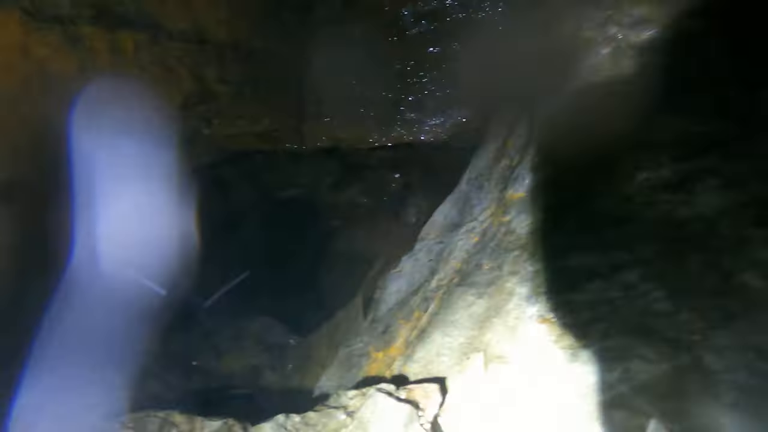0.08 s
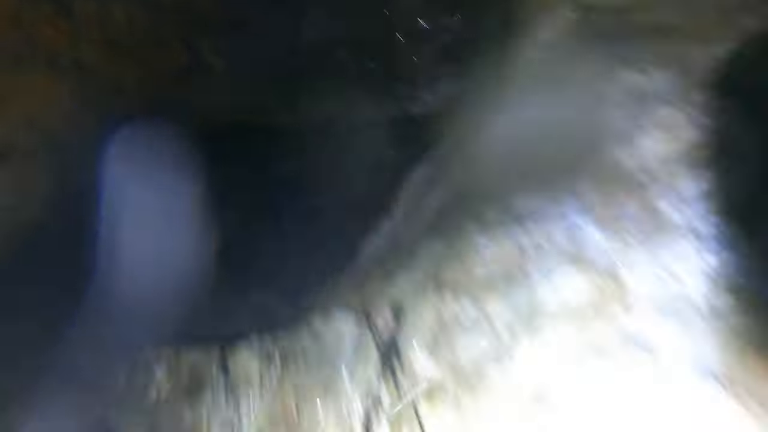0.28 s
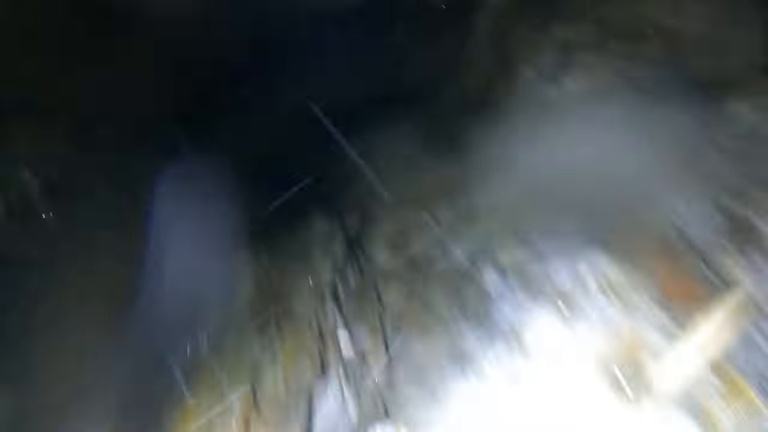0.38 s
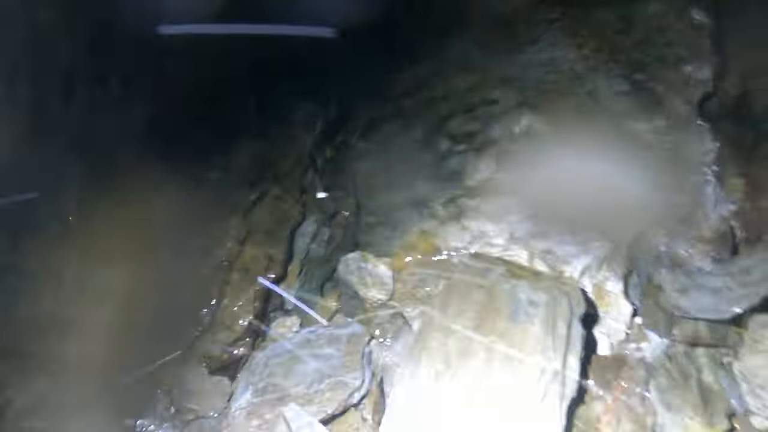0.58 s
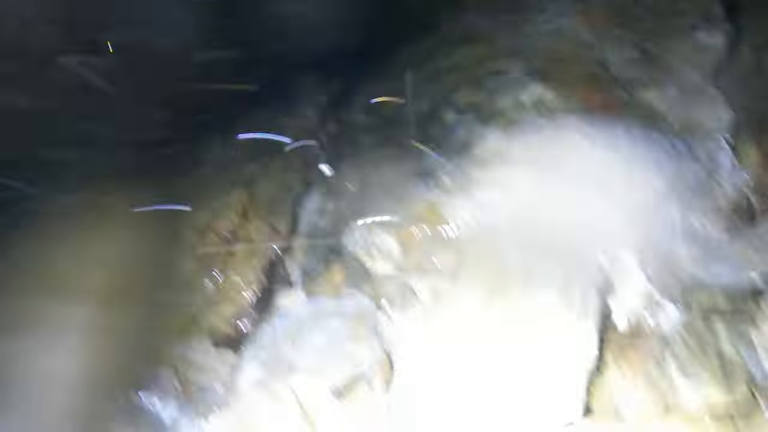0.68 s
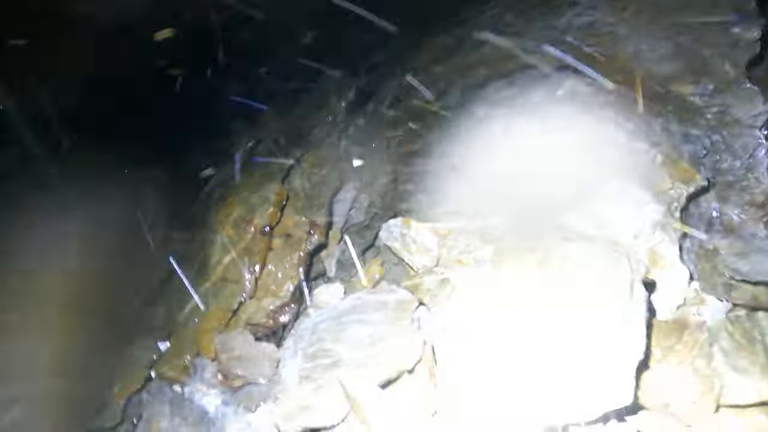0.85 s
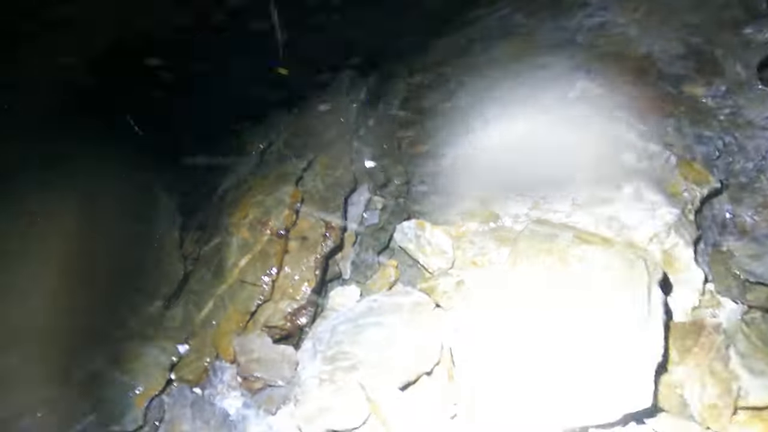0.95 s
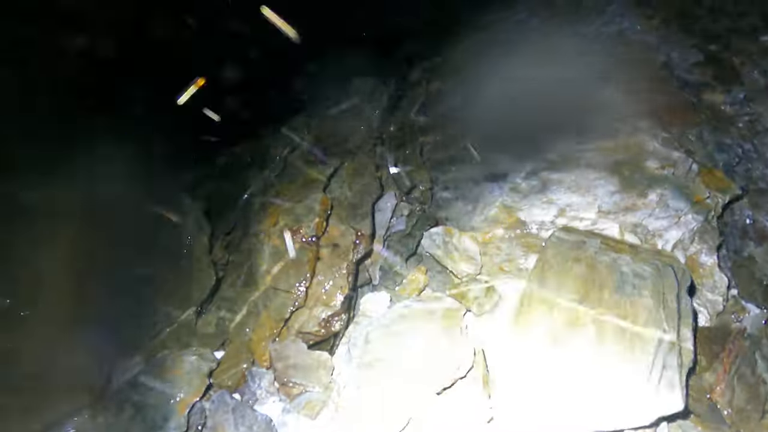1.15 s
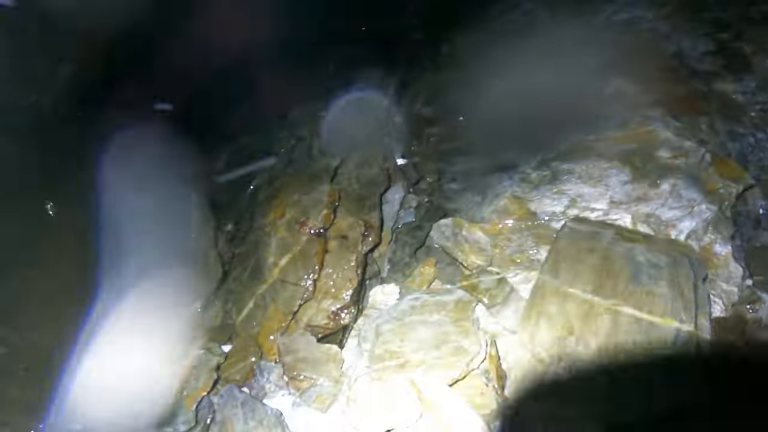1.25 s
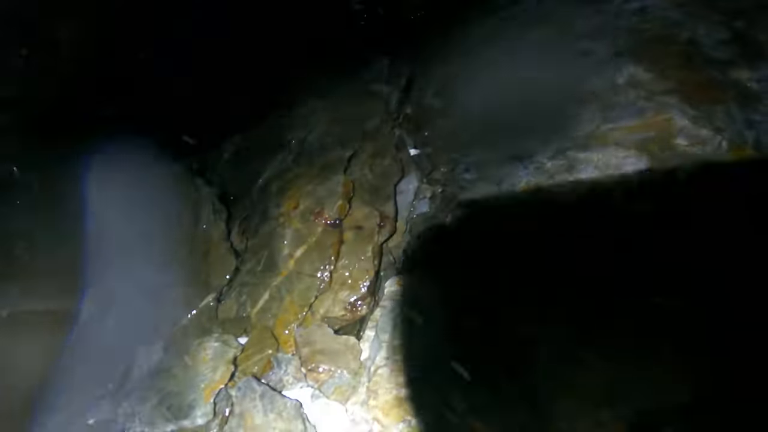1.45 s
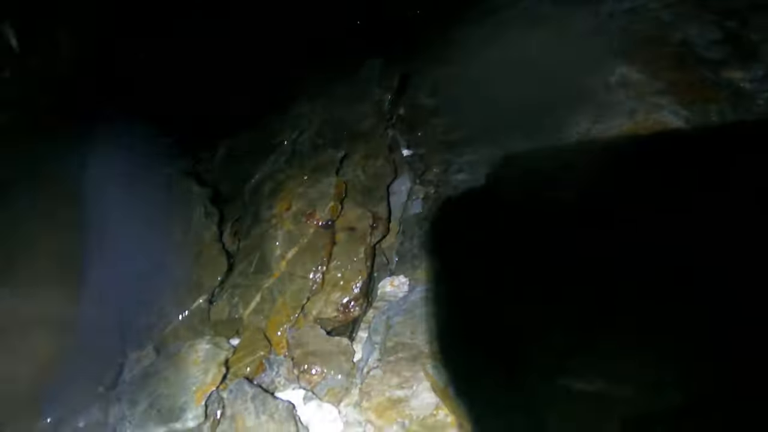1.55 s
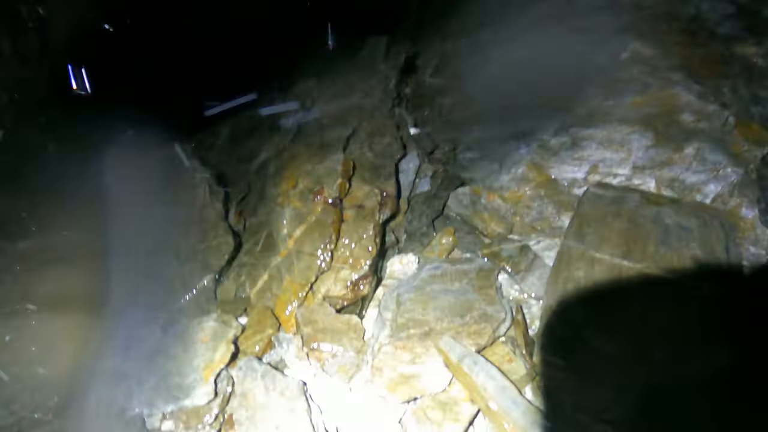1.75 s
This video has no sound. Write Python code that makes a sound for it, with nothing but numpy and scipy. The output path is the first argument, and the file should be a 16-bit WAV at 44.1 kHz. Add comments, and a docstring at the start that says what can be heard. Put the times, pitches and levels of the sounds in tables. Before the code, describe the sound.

Dripping water spatters close by, then the camera case knocks and scrapes on stone, and sparse drops follow

```python
"""Close drops splash on a sealed hand-held camera over a soft low rumble and the patter of falling water.
Drops and patter are filtered noise, with a decaying sine in each close drop; the case colours both.
Knocks and scrapes on cave rock excite damped modes of the case; the glove rubs and creaks along it.
The hand adds shaped low noise, a sagging thump and soft taps."""
import sys
import numpy as np
from scipy import signal
from scipy.fft import rfft, irfft
from scipy.io import wavfile
from scipy.ndimage import uniform_filter1d

SR = 44100
rng = np.random.default_rng(int(sys.argv[2]) if len(sys.argv) > 2 else 0)


def log_audio(samples):
    """Write samples as a 16-bit WAV file to the path given in sys.argv[1]."""
    # one column per channel
    frames = np.atleast_2d(samples).T
    # limit to full scale, then quantise
    limited = np.clip(frames, -1, 1)
    pcm = np.round(limited * 32767).astype(np.int16)
    wavfile.write(sys.argv[1], SR, pcm)


N = 79380  # length [samples]
PAD = 8192  # silence that keeps filter tails from wrapping round [samples]

# Hand rumble in two stretches: (time [s], level [dB])
RUMBLE_LEVEL = [
    [(0.0, -30), (0.028, -28), (0.05, -36), (0.1, -31.5), (0.2, -25), (0.218, -22), (0.25, -21),
     (0.282, -18.5), (0.354, -15), (0.4, -28), (0.57, -17), (0.618, -27.5), (0.694, -21.5), (0.72, -19)],
    [(0.84, -40.5), (0.868, -35), (0.908, -36), (0.98, -31.5), (1.004, -34.5), (1.118, -33.5), (1.142, -48),
     (1.21, -26.5), (1.342, -40), (1.4, -29), (1.618, -28.5), (1.638, -40), (1.668, -33), (1.8, -27)],
]
# Spectrum of the rumble: (frequency [Hz], relative level [dB])
RUMBLE_COLOUR = [(8.8, 4.5), (15, 1), (32, 6), (48, 3), (61, -6), (71, -14.5), (107, -25), (269, -50),
                 (400, -57), (520, -86), (880, -120)]
# Finger taps: (time [s], level [dB], time to the crest of the push [s], ring relative to low tone [dB])
FINGER_TAPS = [(0.001, -39, 0.0023, -34), (0.063, -34.5, 0.0016, -12.5), (0.116, -31, 0.0025, -13.5),
               (0.155, -29.5, 0.0035, -43), (0.177, -36, 0.0012, -36), (0.503, -44, 0.0027, -28),
               (0.526, -54, 0.0048, -12), (0.618, -30, 0.0038, -34), (0.738, -18, 0.0017, -31),
               (0.761, -18.5, 0.0015, -21), (1.165, -43, 0.0037, -27), (1.268, -49, 0.00092, -3.5),
               (1.363, -48.5, 0.0068, -25), (1.432, -43.5, 0.0028, -45), (1.572, -42, 0.0024, -16.5),
               (1.598, -57, 0.0024, -7), (1.777, -46.5, 0.0022, -12.5)]
# Patter on rock: (time [s], small bright drops [dB], lower trickle [dB])
PATTER_LEVELS = [(0.0, -46.5, -63), (0.15, -53, -55), (0.27, -53.5, -62.5), (0.536, -57.5, -61),
                 (0.656, -61.5, -57), (0.71, -52.5, -58), (0.776, -49, -91), (0.846, -60.5, -67),
                 (1.046, -67.5, -69.5), (1.228, -63.5, -66.5), (1.474, -60.5, -59.5), (1.8, -57.5, -61.5)]
# Pitches of the small bright drops: (frequency [Hz], ...)
BRIGHT_PITCHES = (2280, 2930, 3740, 4300, 4800, 5530, 6720, 7790, 8850)
# Pitches of the lower trickle: (frequency [Hz], ...)
TRICKLE_PITCHES = (1117, 1210, 1600, 1850)
# Spells of the glove rubbing the case: (time [s], level [dB])
RUB_SPELLS = [
    [(0.2, -52), (0.21, -67), (0.232, -43), (0.304, -39.5), (0.324, -37), (0.348, -56), (0.36, -71)],
    [(0.555, -59), (0.575, -35), (0.6, -70)],
    [(0.72, -50), (0.74, -23.5), (0.764, -24), (0.79, -36.5), (0.828, -74), (0.84, -58), (0.86, -35)],
]
# Spectrum of the rub: (frequency [Hz], relative level [dB])
RUB_SPECTRUM = [(60, 9), (150, -1.5), (300, -11.5), (500, -11), (700, -16), (1300, -15), (2500, -21.5),
                (6000, -76)]
# Creak of the slipping glove: (time [s], mean slip rate [Hz], level [dB])
CREAK_PATH = [(.222, 171.7, -60), (.245, 194, -47), (.265, 326, -53), (.285, 546, -50), (.3, 478, -59),
              (.325, 499, -43.5), (0.346, 495, -65)]
# Modes of the case: (frequency [Hz], level before brightness tilt [dB], t60 [s], left minus right [dB])
CASE_MODES = [(600, -23, .014, 7), (950, -18, .01, 6), (1590, 0, .014, 5.5), (1790, -9, .01, 5),
              (2500, -7, .008, 1.5), (2920, -10, .009, .1), (4000, -6, .008, 0.1), (4900, -11, .006, -2.5),
              (5800, -13, .006, 0.1), (7200, -20, .005, 0.1)]
# Spells of scraping on stone: (time [s], level [dB])
SCRAPE_SPELLS = [
    [(0.55, -74), (0.574, -46), (0.6, -64)],
    [(0.765, -39), (0.767, -60), (0.775, -40), (0.789, -32), (0.803, -33.5), (0.827, -67), (0.837, -45),
     (0.843, -35.5), (0.851, -55), (0.88, -66)],
]
# Knocks on stone: (time [s], level [dB], brightness [dB per octave], contact time constant [s],
# mean pitch [share of the free shell])
STONE_KNOCKS = [(.7438, -8.5, -1, .0011, 1.0), (.7575, -14, 5, .001, .98), (.8379, -9.5, -1, .0006, 1.07),
                (.7495, -25, 3, .001, 1.05), (.8085, -27, -1.5, .001, .98), (.822, -36, -3, .001, 1.01),
                (.828, -35, -1.5, .001, 1.05), (.8348, -26, 0, .001, 1.05)]
# Close drops: (time [s], relative level [dB], splash centre [Hz], width of each filter pass [share of centre],
# spatter gain [dB], spatter t60 [s])
CLOSE_DROPS = [(0.0352, -22, 4500, 0.69, -20, 0.045), (0.0524, -60, 4820, 1, -23, 0.11),
               (0.0737, -34, 4970, 1, 4, 0.033), (0.0864, -30.5, 5400, 0.25, -5, 0.049),
               (0.102, -22.5, 6300, 0.52, -31, 0.066), (0.1183, -27, 5300, 0.28, -15, 0.042),
               (0.1346, -28, 5100, 0.42, -0.5, 0.05), (0.1501, -29.5, 4430, 0.62, -2.5, 0.12),
               (0.175, -22.5, 4950, 0.29, -4, 0.072), (0.2078, -12.5, 4270, 1, -8.5, 0.12),
               (0.2315, -12, 5040, 0.24, -14.5, 0.064), (0.252, -36, 4490, 0.45, -4, 0.066),
               (0.2929, -16.5, 4180, 1, -12, 0.11), (0.2925, -27, 10600, 0.47, -6, 0.12),
               (0.3248, -32.5, 4800, 0.49, -5, 0.081), (0.3652, -32, 3600, 0.41, -6.5, 0.065),
               (0.39, -31.5, 5370, 0.34, -15, 0.057), (0.4254, -41, 4940, 0.6, -14, 0.079),
               (0.4394, -32.5, 4730, 0.29, -1, 0.03), (0.46, -22.5, 4300, 0.98, -0.5, 0.13),
               (0.4816, -28.5, 5050, 0.82, -9, 0.08), (0.4917, -26.5, 6650, 0.52, -6, 0.07),
               (0.5036, -19, 4500, 0.32, -8, 0.14), (0.523, -27, 4530, 1, -35, 0.1),
               (0.561, -23, 5200, 0.81, -7, 0.21), (0.5826, -21.5, 4800, 1, -29, 0.16),
               (0.5956, -28.5, 4800, 0.94, -2.5, 0.11), (0.6785, -28.5, 5320, 0.48, -6.5, 0.2),
               (0.7068, -23.5, 5460, 0.24, -7, 0.17), (0.7312, -50.5, 2660, 0.7, 6, 0.48),
               (0.8432, -30, 4530, 0.236, -6.5, 0.072), (0.863, -36, 4300, 0.29, -8.5, 0.11),
               (0.9181, -55, 4740, 0.76, 9.5, 0.2), (0.9618, -30, 4600, 0.85, -11.5, 0.2),
               (0.9763, -36, 7730, 0.66, -3.5, 0.11), (0.9933, -44.5, 4870, 0.72, -0.5, 0.23),
               (1.03, -36.5, 3140, 0.66, -13, 0.097), (1.0893, -42, 5070, 1, -3, 0.13),
               (1.1447, -44, 6500, 0.65, -16, 0.11), (1.167, -44, 6020, 0.73, -9, 0.13),
               (1.19, -39.5, 6540, 0.95, -16, 0.087), (1.289, -45, 5130, 1, 0, 0.91),
               (1.313, -42, 8470, 1, -2, 0.24), (1.374, -38, 3000, 0.98, 0, 0.12),
               (1.4356, -35.5, 4300, 0.2, -7.5, 0.08), (1.4864, -37, 4900, 0.37, -5.5, 0.43),
               (1.5609, -37.5, 5570, 1, 0.5, 0.11), (1.6122, -37, 4700, 0.69, -9.5, 0.27),
               (1.6433, -49, 4470, 0.32, 0, 0.23), (1.664, -30.5, 4760, 0.91, -7, 0.15)]
# Gurgles of the trickle, mostly lower: same columns as the close drops
TRICKLE_GURGLES = [(0.08, -41.5, 2380, 0.79, 7, 0.052), (0.1739, -33.5, 2370, 0.72, 5.5, 0.064),
                   (0.268, -56, 960, 0.13, -4, 0.14), (0.309, -41, 2830, 0.3, -2, 0.073),
                   (0.4603, -24.5, 2880, 0.18, -10.5, 0.044), (0.415, -33, 1067, 0.34, 0.5, 0.033),
                   (0.574, -26.5, 1950, 0.39, -5.5, 0.026), (0.646, -31, 1205, 0.25, -2, 0.024),
                   (1.292, -50, 1300, 0.09, 2.5, 0.26), (1.3551, -47.5, 2800, 1, 6.5, 0.15),
                   (1.4906, -50, 3020, 0.24, 0, 0.07), (1.5116, -48, 2800, 0.3, 3.5, 0.37),
                   (1.5302, -37.5, 1600, 0.29, -1.5, 0.24), (1.5688, -46.5, 1530, 0.46, 5, 0.14),
                   (1.613, -50, 2730, 0.3, -1, 0.091), (1.676, -53.5, 2750, 0.36, 6, 0.089),
                   (1.723, -33, 1410, 1, -6, 0.044)]
# Colour of airborne sound inside the case: (frequency [Hz], relative gain [dB])
CASE_COLOUR = [(180, -36.5), (300, -9), (700, -11), (850, -15.5), (1240, -10), (1570, -9), (2110, -9.5),
               (2730, -0.5), (3580, -8.5), (4440, -0.3), (5500, -4), (7500, -9.5), (8200, -15),
               (10000, -21), (12500, -26), (16000, -70)]
# Level difference of the two microphone ports: (frequency [Hz], left minus right [dB])
PORT_LEVEL = [(60, 5), (100, -11), (170, -11), (300, -2), (500, -0.5), (860, -1), (1460, -0.5), (2480, 6),
              (4220, -3.5), (7190, 0.5)]
# Phase difference of the ports: (frequency [Hz], lead of the left [radians])
PORT_PHASE = [(0, 5), (340, 1), (780, 1.1), (1290, 1.29), (1890, -1.47), (2410, -1.1), (2760, -1.54),
              (3190, 1.3), (3450, -3), (3700, 0.35), (4130, 1.21), (5000, -0.0), (7320, 0.07)]
# Sound the ports do not share: (frequency [Hz], gain [dB])
UNSHARED = [(200, 25), (700, -42), (1500, -27), (3000, -11.5), (5000, -22), (9000, -9.5), (14000, -2)]


def undb(db):
    """Decibels express the logarithm of an amplitude ratio; this inverts it."""
    return 10 ** (np.asarray(db) / 20)


def unit(x):
    """Root-mean-square amplitude measures mean power; here it is set to one."""
    return x / np.sqrt(np.mean(x ** 2))


def over_time(rows):
    """Amplitude envelope: gain along a (time [s], level [dB]) curve."""
    seconds, db = np.array(rows).T
    return undb(np.interp(np.arange(N) / SR, seconds, db))


def spells(tables):
    """Gated envelope: gain along several short level curves, silent between them, with softened edges."""
    t = np.arange(N) / SR
    gain = sum(over_time(rows) * (t > rows[0][0]) * (t < rows[-1][0]) for rows in tables)
    return uniform_filter1d(gain, size=200)


def over_hz(rows):
    """Frequency response: (frequency [Hz], value) points interpolated on a logarithmic frequency scale."""
    hz, value = np.array(rows, float).T
    bins = np.fft.rfftfreq(N + PAD, 1 / SR)
    return np.interp(np.log(bins + 1), np.log(hz + 1), value)


def colour(x, rows):
    """Linear filtering: multiply the spectrum by a (frequency [Hz], gain [dB]) curve."""
    return irfft(rfft(x, N + PAD) * undb(over_hz(rows)))[..., :N]


def fall(t, t60):
    """Exponential decay: the amplitude loses 60 dB in t60 seconds."""
    return np.exp(-np.log(1000) * t / max(t60, 1e-3))


def band(x, hz, width):
    """Resonance: a single peak passes energy near its centre, over a bandwidth in Hz."""
    b, a = signal.iirpeak(min(hz, 15000), hz / width, SR)
    return signal.lfilter(b, a, x)


def butter(x, order, hz, kind="low"):
    """Cutoff filtering: a Butterworth response keeps one side of a corner frequency."""
    return signal.sosfilt(signal.butter(order, hz, kind, fs=SR, output="sos"), x)


def add(out, x, start):
    """Superposition: sounds add sample by sample from a start time in seconds."""
    i = int(start * SR)
    out[..., i:i + x.shape[-1]] += x[..., :N - i]


def grains(per_s, scatter_db, t60):
    """Shot noise: random impacts of uneven power gate two independent noises with the same decaying bursts."""
    impacts = rng.random(N) < per_s / SR
    hits = impacts * undb(2 * scatter_db * rng.exponential(size=N))
    power = signal.lfilter([1], [1, -fall(2 / SR, t60)], hits)  # power decays twice as fast in dB
    return unit(np.sqrt(power) * rng.standard_normal((2, N)))


def rumble():
    """Broadband excitation: low-weighted noise follows the movement of the grip."""
    noise = unit(colour(rng.standard_normal(N), RUMBLE_COLOUR))
    return noise * over_time(RUMBLE_LEVEL[0] + RUMBLE_LEVEL[1])


def thump():
    """Damped oscillation: the blow shakes camera and hand, and the swing slows as it settles."""
    start_hz, settled_hz, sag_s = 79., 35.3, 0.0084
    rise_s, hold_s, t60_s = 0.0023, 0.028, 0.15
    out, t = np.zeros(N), np.arange(SR // 4) / SR
    turns = settled_hz * t + (start_hz - settled_hz) * sag_s * (1 - np.exp(-t / sag_s))
    envelope = (1 - np.exp(-t / rise_s)) ** 2 * fall(np.maximum(t - hold_s, 0), t60_s)
    swing = envelope * np.sin(2 * np.pi * turns)
    add(out, undb(-5) * swing / np.abs(swing).max(), .734)
    return out


def taps():
    """Impulsive forcing: each soft finger push shapes a low tone and a higher ring."""
    tap_hz, ring_hz = 122, 495
    out, t = np.zeros(N), np.arange(SR // 4) / SR
    for s, db, crest_s, ring_db in FINGER_TAPS:
        push = t / crest_s * np.exp(1 - t / crest_s)
        tone = np.sin(2 * np.pi * tap_hz * t) + undb(ring_db) * np.sin(2 * np.pi * ring_hz * t)
        add(out, undb(db) * push * tone, s)
    return out


def plinks(pitches):
    """Resonant filtering: far drops plink, each size at its own pitch, over the hiss of running water."""
    per_s, scatter_db, t60_s, hiss_db = 200., 3.5, 0.023, -3.5  # drops per second at each pitch
    width = 0.3  # share of the pitch
    out = 0
    for hz in pitches:
        impacts = grains(per_s, scatter_db, t60_s)
        hiss = undb(hiss_db) * rng.standard_normal((2, N))
        out = out + band(impacts + hiss, hz, width * hz)
    return unit(out)


def patter():
    """Superposition of independent sources: small bright drops and a lower trickle have separate envelopes."""
    rows = np.array(PATTER_LEVELS)
    bright = plinks(BRIGHT_PITCHES) * over_time(rows[:, :2])
    trickle = plinks(TRICKLE_PITCHES) * over_time(rows[:, ::2])
    return bright + trickle


def rub():
    """Rough sliding friction: many small contacts of the glove give a dull, uneven noise."""
    mid, side = colour(grains(400., 3.6, 0.033), RUB_SPECTRUM)
    side = butter(side, 2, 400, "high")  # lows stay alike at both ports
    return unit(mid + undb(-3.5) * side * np.array([[1], [-1]])) * spells(RUB_SPELLS)


def creak():
    """Stick-slip friction: uneven slips of the glove give a rough tone that climbs, then levels off."""
    wobble, rough_db, pan_db = 0.072, 2.5, 0.5  # rms share of rate, rms level, left minus right
    rows = np.array(CREAK_PATH)
    shake = unit(uniform_filter1d(rng.standard_normal((2, N)), size=250))
    mean_hz = np.interp(np.arange(N) / SR, rows[:, 0], rows[:, 1])
    phase = 2 * np.pi * np.cumsum(mean_hz * (1 + wobble * shake[0])) / SR
    tone = (np.sin(phase) + undb(-20) * np.sin(2 * phase)) * undb(rough_db * shake[1])
    pan = undb(np.array([[pan_db], [-pan_db]]) / 2)
    return tone * spells([rows[:, ::2]]) * pan


def shell(force, pitch, bright_db):
    """Modal synthesis: a force rings the damped modes of the case; brightness tilts them per octave."""
    out = 0
    force = butter(force, 4, 7700)
    for k, ((hz, db, t60, pan_db), share) in enumerate(zip(CASE_MODES, pitch)):
        w = 2 * np.pi * hz * share / SR
        r = fall(1 / SR, t60)
        ring = signal.lfilter([0, np.sin(w)], [1, -2 * r * np.cos(w), r * r], force)
        tilt_db = bright_db * np.log2(hz / 1600)
        gain = undb(db + tilt_db + np.array([[pan_db], [-pan_db]]) / 2)
        out = out + (-1) ** k * ring * gain  # neighbouring modes alternate in sign
    return out


def scrape():
    """Frictional excitation: grit catches and slips on stone in dense ticks that ring the shell."""
    ticks = grains(2500, 0.67, 0.0035)
    mid, side = (unit(shell(x, np.ones(len(CASE_MODES)), 1.9)) for x in ticks)
    return (mid + undb(-5.0) * side * np.array([[1], [-1]])) * spells(SCRAPE_SPELLS)


def knocks():
    """Impact excitation: a blow and gritty contact ring the shell under a dry crack; the grip shifts its pitch."""
    grit_db, mode_jitter = -23, .01  # jitter as share of mode frequency
    crack_db, crack_t60_s, crack_top_hz = -10, 0.0083, 4760  # level before brightness is added
    out, t = np.zeros((2, N)), np.arange(SR // 10) / SR
    for s, db, bright_db, contact, pitch in STONE_KNOCKS:
        grit, crack = rng.standard_normal((2, len(t)))
        onset = 1 - np.exp(-t / contact)
        force = (t == 0) + undb(grit_db) * grit * np.exp(-t / contact)
        mode_pitch = pitch + mode_jitter * rng.standard_normal(len(CASE_MODES))
        ring = shell(force, mode_pitch, bright_db) * onset
        ring = ring / np.abs(ring.mean(axis=0)).max()
        crack = unit(np.diff(butter(crack, 5, crack_top_hz), prepend=0))
        crack = undb(crack_db + bright_db) * crack * fall(t, crack_t60_s) * onset
        add(out, undb(db) * (ring + crack), s)
    return out


def drops():
    """Transient resonance: a ping and quick splat near the drop's own pitch, with a gritty droplet spatter."""
    splat_t60_s, attack_s, broad_db = 0.02, .0003, -12
    ping_db, ping_width = -3, 0.21  # width as share of the pitch
    out, t = np.zeros((2, N)), np.arange(SR // 4) / SR  # rows: shared and unshared sound
    spray = grains(910, 1.8, 0.024)
    for s, db, hz, width, spatter_db, t60 in CLOSE_DROPS + TRICKLE_GURGLES:
        i = rng.integers(N - len(t))
        splat = rng.standard_normal((2, len(t))) * fall(t, splat_t60_s)
        spatter = undb(spatter_db) * spray[:, i:i + len(t)] * fall(t, t60)
        burst = (1 - np.exp(-t / attack_s)) * (splat + spatter)
        wide = np.clip(width, .05, 2) * hz
        tone = band(band(burst, hz, wide), hz, wide) * np.sqrt(SR / 2 / wide)  # offsets power lost to the filter
        ping = undb(ping_db) * np.sin(2 * np.pi * hz * t) * np.exp(-np.pi * ping_width * hz * t)
        ping = ping * np.array([[1], [.5]])
        add(out, undb(db) * (ping + tone + undb(broad_db) * burst) / 4, s)
    return out


def ports(pair):
    """Partial coherence: case-coloured shared and unshared sound reach two ports with level and phase differences."""
    case = undb(over_hz(CASE_COLOUR))
    shared, own = rfft(pair, N + PAD) * case / np.sqrt(np.mean(case ** 2))
    own = own * undb(over_hz(UNSHARED))
    half = undb(over_hz(PORT_LEVEL) / 2) * np.exp(.5j * over_hz(PORT_PHASE))  # half the difference per port
    return irfft(np.array([(shared + own) * half, (shared - own) / half]))[:, :N]


def scene():
    """Linear superposition: airborne water passes the case colour; handling and contact add directly."""
    handling = rumble() + thump() + taps()  # alike at both ports
    water = ports(patter() + drops())
    return handling + water + rub() + creak() + scrape() + knocks()


def record(dry):
    """Band limiting: the recorder cuts the top with an elliptic low-pass; a short fade ends the rendered sound."""
    top_hz, fade_s = 15900, .006
    remaining = np.arange(N)[::-1] / SR
    fade = np.sin(np.pi / 2 * np.minimum(remaining / fade_s, 1))
    return fade * signal.sosfilt(signal.ellip(8, .2, 70, top_hz, fs=SR, output="sos"), dry)


dry = scene()
out = record(dry)
log_audio(out)
```